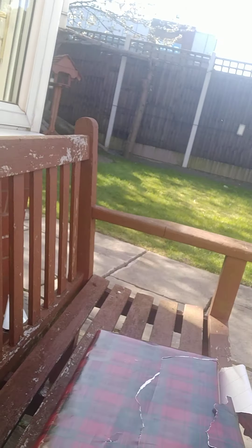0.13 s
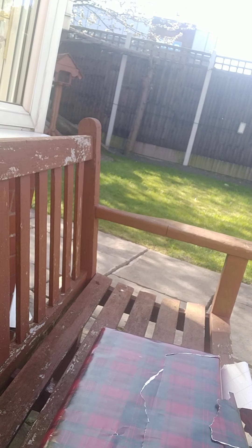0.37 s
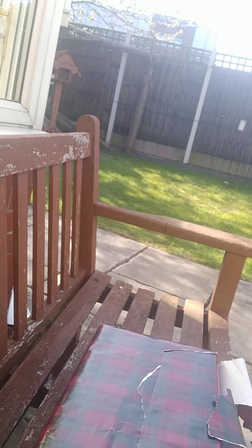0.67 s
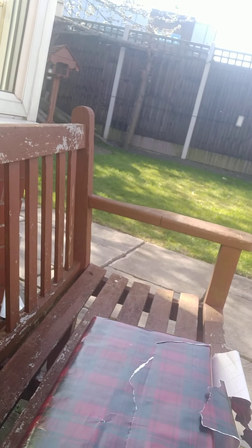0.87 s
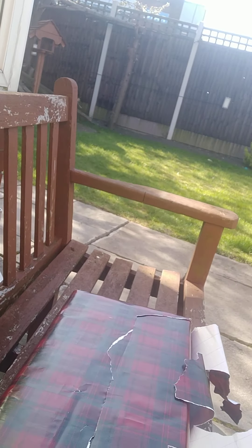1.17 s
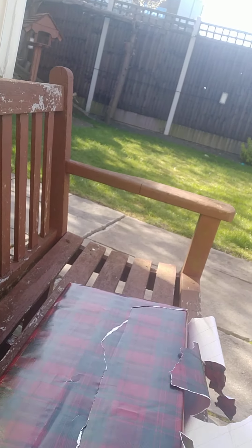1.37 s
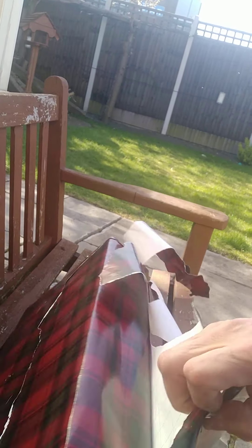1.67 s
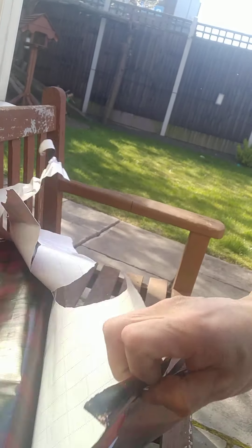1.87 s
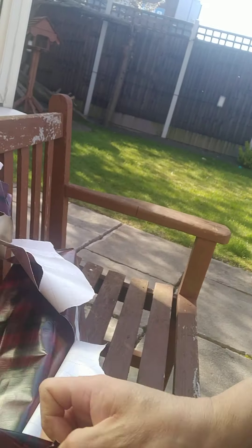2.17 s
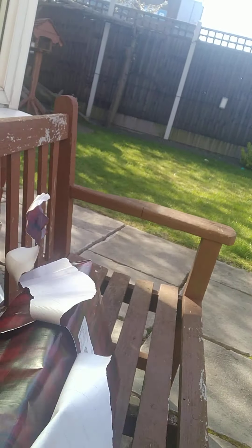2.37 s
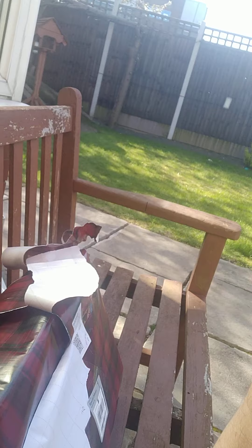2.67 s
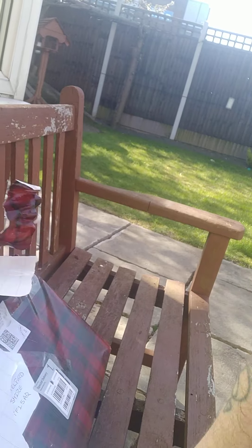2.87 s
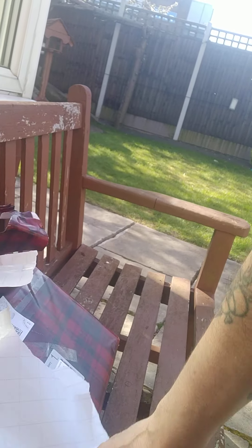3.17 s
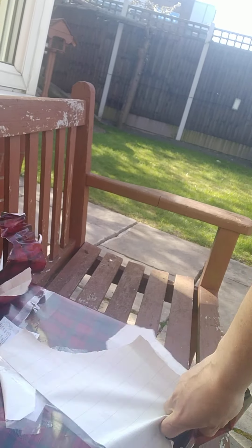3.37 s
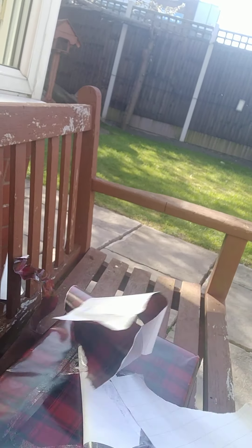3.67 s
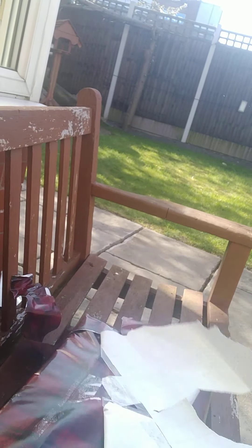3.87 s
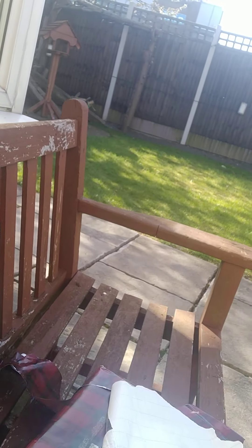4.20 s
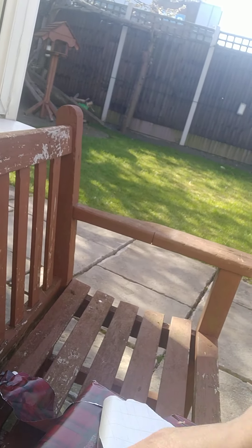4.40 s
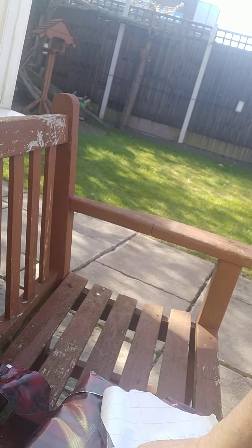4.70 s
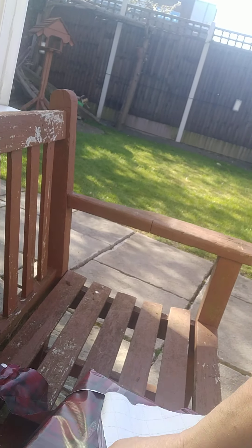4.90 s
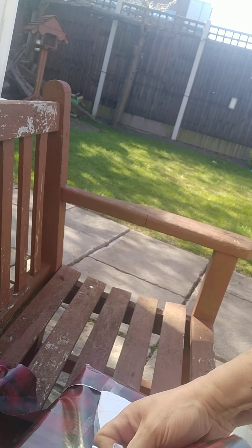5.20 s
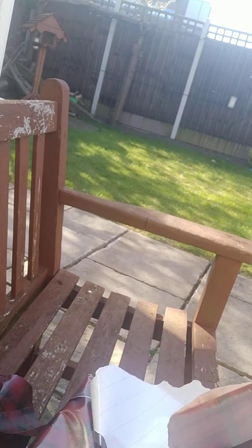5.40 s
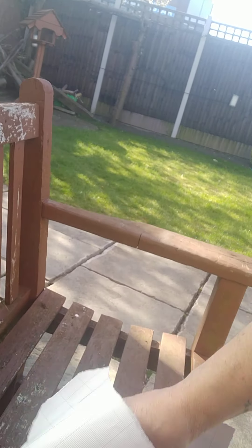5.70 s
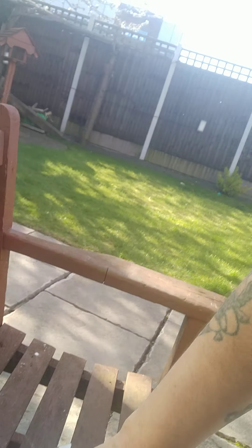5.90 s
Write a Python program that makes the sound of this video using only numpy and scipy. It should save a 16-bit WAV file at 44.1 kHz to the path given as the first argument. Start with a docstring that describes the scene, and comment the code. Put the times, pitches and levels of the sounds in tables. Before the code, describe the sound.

Close, bright tearing and crinkling of stiff gift wrap by hand outdoors, with dull box knocks and low rumble on the microphone.

```python
"""Wrapping paper is torn off a parcel on a garden bench, an arm's length from a hand-held phone.
Fibres break in dense noisy streams as it rips and crinkles; creases crack and ring one by one.
The box thumps as a damped swing and squeaks by stick and slip where paper slides over it.
Moving air and the handling of the parcel rumble on the microphone as low noise, over a quiet
garden of coloured noise."""
import sys
import numpy as np
from scipy import signal
from scipy.fft import rfft, irfft
from scipy.io import wavfile
from scipy.ndimage import uniform_filter1d

SR = 44100
rng = np.random.default_rng(int(sys.argv[2]) if len(sys.argv) > 2 else 0)


def inscribe(sig):
    """Save sig as 16-bit PCM at rate SR to the path in sys.argv[1].

    A 1-D sig is mono; a 2-D sig holds one channel per row.
    Samples are clipped to [-1, 1] before scaling.
    """
    pcm = np.round(np.clip(np.atleast_2d(sig).T, -1, 1) * 32767)
    wavfile.write(sys.argv[1], SR, pcm.astype(np.int16))


N = 266805
T = np.arange(N) / SR  # s

# spectrum of breaking paper, columns: f/Hz, level/dB (per Hz)
PAPER_SPECTRUM = [(71, -39), (120, -6), (272, -3), (410, -1), (524, -12.5), (874, -3.5), (1400, -9),
                  (2480, -1), (4590, -2.5), (7050, -2.5), (9590, -9), (12000, -22.5), (15000, -20.5),
                  (16000, -15)]


def undb(db):
    """Turn dB into an amplitude factor."""
    return 10 ** (np.asarray(db) / 20)


def unit(x):
    """Scale to an RMS of 1."""
    return x / np.sqrt(np.mean(x ** 2))


def colour(x, points):
    """Causal filter through (Hz, dB) points, from the folded cepstrum."""
    hz, db = np.transpose(points)
    grid_hz = np.maximum(np.fft.rfftfreq(4096, 1 / SR), 1)
    gain = undb(np.interp(np.log(grid_hz), np.log(hz), db))
    cepstrum = irfft(np.log(gain))
    half = len(cepstrum) // 2
    cepstrum[1:half] *= 2
    cepstrum[half + 1:] = 0
    impulse = irfft(np.exp(rfft(cepstrum)))
    return signal.fftconvolve(x, impulse)[:len(x)]


def butter(x, hz, kind, order=2):
    """Butterworth filter."""
    return signal.sosfilt(signal.butter(order, hz, kind, fs=SR, output="sos"), x)


def ring(x, hz, width_hz):
    """Resonance with gain 1 at its centre."""
    b, a = signal.iirpeak(hz, hz / width_hz, SR)
    return signal.lfilter(b, a, x)


def walk(rate):
    """Random levels 1 / rate s apart, joined by straight lines; spread near 1."""
    knots = np.arange(0, N / SR + 1 / rate, 1 / rate)
    return 1.2 * np.interp(T, knots, rng.standard_normal(len(knots)))


def fade(t60, size):
    """Exponential decay by 60 dB in t60 seconds, 3 ms at the least."""
    return np.exp(-np.log(1000) * np.arange(size) / SR / max(t60, .003))


def fibres(treble_db, body_db, flap_hz, flap_db, per_s, spread_db, most_db,
           reach_oct, cycles, smear_s, patchy_db, patch_rate):
    """Breaks of very unequal size; each rings the patch of sheet round it, so each has its own pitch."""
    bands_hz = 170 * 2 ** np.arange(0, 6.6, .5)  # half an octave apart
    paper_hz, paper_db = np.transpose(PAPER_SPECTRUM)

    chance = rng.random((3, int(per_s * N / SR)))
    at = (chance[0] * N).astype(int)
    size_db = np.minimum(-spread_db * np.log(1 - chance[1]), most_db)
    power = undb(2 * size_db)  # amplitude squared
    pitch_hz = bands_hz[0] * (bands_hz[-1] / bands_hz[0]) ** chance[2]

    out, body_power = 0, 0
    for hz in bands_hz:
        nearness = np.exp(-(np.log2(hz / pitch_hz) / reach_oct) ** 2)
        hits = np.bincount(at, power * nearness, N)
        # low patches ring longer
        decay = fade(smear_s + cycles / hz, size=2)[1]
        envelope = np.sqrt(signal.lfilter([1], [1, -decay ** 2], hits))
        band = butter(envelope * rng.standard_normal(N), [hz / 2 ** .25, hz * 2 ** .25], "band")
        # a band's width grows with its pitch
        strength = undb(np.interp(np.log(hz), np.log(paper_hz), paper_db)) * np.sqrt(hz)
        body_power += strength ** 2 * (1400 < hz < 6000)
        # treble lift grows from 4 to 8 kHz, body lift from 2 down to 1 kHz
        lift_db = np.clip(np.log2(hz / 4000), 0, 1) * treble_db
        lift_db = lift_db + np.clip(np.log2(2000 / hz), 0, 1) * body_db
        lift_db = lift_db + flap_db * np.exp(-(np.log2(hz / flap_hz) / 0.17) ** 2)
        lift_db = lift_db + 1.48 * walk(12)  # each band drifts on its own
        out = out + strength * unit(band) * undb(lift_db)
    patches = unit(undb(patchy_db * walk(patch_rate)))
    return out * patches / np.sqrt(body_power)


def rips():
    """A dense stream of breaking fibres swells, holds and dies; the strongest rip of the moment sounds."""
    # the long first tear, which grows and breaks off
    # columns: t/s, level/dB, treble lift/dB, ring of the taut flap f/Hz
    first_tear = [(0.0, -24, 2, 3160), (0.04, -26, 7.5, 3550), (0.104, -24, 0, 2650),
                  (0.17, -27.5, 2, 3460), (0.352, -24, 6.5, 3130), (0.406, -25.5, 5, 4150),
                  (0.464, -17, 3.5, 2980), (0.511, -12.5, 5, 3640), (0.521, -39, 4, 3960)]
    # short rips, columns: full strength from t/s, peak level/dB, swell t/s, hold t/s, dying t/s,
    # treble lift/dB, ring of the taut flap f/Hz
    short_rips = [(0.645, -40.5, 0.046, .004, .01, -33, 2970), (0.723, -35, .02, 0.012, .012, -33, 3030),
                  (0.897, -39, 0.0075, 0.021, 0.062, -8, 3170), (1.648, -16, 0.0072, 0.021, .08, 0, 3260),
                  (1.708, -26, 0.0033, .01, 0.13, 1, 2870), (1.788, -21.5, 0.056, 0.038, .04, -2, 3180),
                  (1.963, -12.5, .012, 0.015, .025, 0.5, 3240),
                  (2.271, -21, 0.059, 0.019, 0.013, -2.5, 3050),
                  (2.367, -23.5, 0.022, 0.023, 0.086, -16, 2930),
                  (2.518, -14, .015, 0.015, 0.034, -5, 3220), (3.097, -25.5, 0.062, 0.037, 0.15, 1.5, 3350),
                  (3.405, -17, 0.059, 0.038, 0.022, -1.5, 3400), (3.624, -14, 0.062, 0.033, 0.042, 2, 3560),
                  (3.901, -12.5, .012, 0.016, .045, 1, 3440), (4.597, -19, 0.012, 0.011, 0.013, -3.5, 2890),
                  (4.712, -14, 0.0034, 0.011, 0.016, -4.5, 2500),
                  (5.115, -14.5, 0.0027, .006, 0.055, -0.5, 3200),
                  (5.373, -17.5, .13, .027, 0.068, 1, 3070), (5.863, -15.5, 0.0031, 0.007, .025, 3, 3030)]
    swell_db, dying_db = 16.5, 26.5  # a rip sets in and stops this far under its peak
    swell_bend, dying_bend = 0.74, 0.95  # 1 = straight in dB
    dull_db_per_db = 0.63  # the treble thins as a rip weakens

    s, *columns = np.transpose(first_tear)
    db, treble_db, flap_hz = (np.interp(T, s, c) for c in columns)
    gain = (T < s[-1]) * undb(db)
    for at, peak_db, swell, hold, dying, lift_db, hz in short_rips:
        a, b = int((at - swell) * SR), int((at + hold + dying) * SR)
        t = T[a:b] - at
        rising_db = swell_db * np.abs(t / swell) ** swell_bend
        falling_db = dying_db * np.maximum((t - hold) / dying, 0) ** dying_bend
        under_db = np.where(t < 0, rising_db, falling_db)
        leads = a + np.flatnonzero(undb(peak_db - under_db) > gain[a:b])
        under_db = under_db[leads - a]
        gain[leads] = undb(peak_db - under_db)
        flap_hz[leads] = hz
        treble_db[leads] = lift_db - dull_db_per_db * under_db
    stream = fibres(treble_db, -1.5, flap_hz, flap_db=8, per_s=5300, spread_db=1.5, most_db=12,
                    reach_oct=2.2, cycles=4.2, smear_s=0.0058, patchy_db=1.1, patch_rate=300)
    return uniform_filter1d(gain, size=64) * stream


def microphone_rumble():
    """Low rumble on the microphone, from moving air and from handling the parcel; uneven in level."""
    # columns: t/s, level/dB
    rumble_levels = [(0.0, -35.5), (1.5, -36), (1.58, -28.5), (2.78, -32), (2.86, -23), (2.91, -35),
                     (3.49, -25.5), (3.64, -41), (3.69, -25), (3.77, -34.5), (6.0, -35), (6.05, -45)]
    rumble = butter(rng.standard_normal(N), 20, "low", order=1)
    rumble = butter(rumble, 96.0, "low", order=3)
    rumble = butter(rumble, 11.7, "high")
    unevenness = undb(1.5 * walk(12))
    return unit(rumble * unevenness) * undb(np.interp(T, *np.transpose(rumble_levels)))


def garden():
    """The quiet garden behind the bench: coloured noise whose level drifts slightly."""
    # columns: f/Hz, level/dB (per Hz)
    garden_spectrum = [(59, -30), (100, 0), (595, -15), (768, -15), (1950, -28), (2320, -23), (14400, -52),
                       (16000, -57)]
    hush = unit(colour(rng.standard_normal(N), garden_spectrum))
    return hush * undb(-51 + 0.5 * walk(2.7))


def thumps(size=8192):
    """A soft push sets the hollow box swinging briefly, with a dull flap of paper."""
    # the box knocked or the sheet flapping, columns: t/s, peak level/dB, pitch f/Hz, t60/s
    knocks = [(0.077, -19.5, 251, 0.14), (0.485, -31, 257, 0.04), (1.653, -19, 284, 0.032),
              (1.655, -18, 76, 0.12), (1.831, -13.5, 269, 0.054), (2.234, -22.5, 344, 0.16),
              (2.501, -18.5, 134, 0.03), (2.612, -9.5, 265, 0.032), (2.645, -12, 167, 0.057),
              (2.974, -21, 432, 0.06), (3.252, -27, 154, 0.035), (3.397, -18, 199, 0.057),
              (3.441, -12, 320, 0.027), (3.49, -22.5, 260, 0.056), (3.699, -13, 188.5, 0.17),
              (3.895, -21, 278, 0.11), (4.605, -17.5, 190, 0.05), (4.61, -19.5, 95, 0.07),
              (5.071, -22, 218, 0.046)]
    out, t = np.zeros(N + size), np.arange(size) / SR
    for s, db, hz, t60 in knocks:
        flap = undb(-6) * unit(ring(rng.standard_normal(size), 0.89 * hz, 0.82 * hz))
        push = 1 - np.exp(-t / 0.0019)  # soft onset
        swing = (np.sin(2 * np.pi * hz * t) + flap) * push * fade(t60, size=size)
        i = int(s * SR)
        out[i:i + size] += undb(db) * swing / np.abs(swing).max()
    return out[:N]


def snaps(size=4096):
    """A crease strains for a moment, gives with one crack, then crackles out; the patch beside it rings."""
    # columns: t/s, peak level/dB, ring f/Hz, t60/s
    creases = [(0.1063, 3, 2520, 0.035), (0.124, -6.5, 5620, 0.042), (0.4254, -6, 3460, 0.032),
               (0.474, 4, 8800, 0.027), (0.488, -2, 5230, 0.019), (0.7559, -20, 2800, 0.019),
               (0.8556, -20.5, 3460, 0.05), (1.073, -22.5, 4000, 0.038), (1.0912, -12, 2600, 0.071),
               (1.214, -9, 3570, 0.088), (1.2316, -13, 6360, 0.035), (1.245, -13, 6300, 0.032),
               (1.365, -10.5, 2750, 0.03), (1.446, -8, 3300, 0.038), (1.6042, -21, 3230, 0.055),
               (1.6258, -16.5, 3170, 0.14), (1.6466, 2, 2980, 0.023), (1.704, 2.5, 1730, 0.17),
               (1.8373, -2, 4100, 0.03), (1.936, -15, 5320, 0.043), (1.9952, -5, 4160, 0.035),
               (2.0223, -7.5, 6170, 0.051), (2.057, -3, 5400, 0.04), (2.082, -15, 4360, 0.027),
               (2.165, -18.5, 940, 0.035), (2.196, -9.5, 2440, 0.032), (2.2841, 5, 2240, 0.023),
               (2.3205, -8, 1220, 0.063), (2.368, -1.5, 2290, 0.033), (2.4577, -0.5, 3330, 0.028),
               (2.4946, -4, 1950, 0.064), (2.5172, 9, 7200, 0.029), (2.5283, 1.5, 3880, 0.026),
               (2.594, -9, 3200, 0.023), (2.632, -8, 2980, 0.089), (2.647, -3.5, 2700, 0.055),
               (2.6813, -4.5, 6100, 0.055), (2.7648, -13.5, 2570, 0.068), (2.828, -16, 4940, 0.028),
               (2.8448, -8, 3670, 0.055), (2.8676, -0.5, 6200, 0.027), (2.901, -10, 5890, 0.018),
               (2.935, -1, 4900, 0.028), (2.9763, -4, 2370, 0.045), (3.027, -13.5, 3370, 0.032),
               (3.2529, -11, 4450, 0.14), (3.3099, -1.5, 4300, 0.066), (3.3595, -4.5, 5260, 0.085),
               (3.4066, 4.5, 3590, 0.067), (3.5665, -0.5, 4360, 0.033), (3.5962, 2.5, 3440, 0.028),
               (3.7023, -4.5, 3970, 0.18), (3.7652, -7.5, 3700, 0.052), (4.027, -13, 3380, 0.1),
               (4.093, -7, 2640, 0.048), (4.174, -13, 3360, 0.015), (4.3157, -11.5, 4270, 0.079),
               (4.333, -12.5, 2940, 0.053), (4.36, -12.5, 7100, 0.086), (4.3797, -3.5, 3570, 0.049),
               (4.4104, -15.5, 7480, 0.032), (4.6959, -5.5, 2600, 0.032), (4.745, -9.5, 2770, 0.086),
               (4.792, -12, 2940, 0.043), (4.8562, -9.5, 3680, 0.03), (4.882, -8.5, 5100, 0.017),
               (4.9146, -8.5, 2770, 0.031), (4.941, -8, 5130, 0.036), (4.9513, -4.5, 2850, 0.17),
               (5.0045, -7, 3400, 0.11), (5.0617, -1.5, 1020, 0.14), (5.1116, -3, 3460, 0.032),
               (5.1783, -6, 4210, 0.038), (5.262, -6, 3860, 0.036), (5.365, 4, 2120, 0.018),
               (5.3889, 5, 4500, 0.047), (5.5077, -11.5, 2580, 0.097), (5.582, -15.5, 8600, 0.085),
               (5.6816, -9.5, 1880, 0.14), (5.7054, -6.5, 2900, 0.093), (5.7667, -7, 2870, 0.024),
               (5.786, -3.5, 7300, 0.053), (5.835, -10, 2650, 0.064), (5.8609, 1, 3500, 0.037),
               (5.9206, -12.5, 2800, 0.028)]
    out, lead = np.zeros(N + size), int(.001 * SR)  # 1 ms of strain before the crack
    for s, db, hz, t60 in creases:
        grain_db = 2.5 * np.repeat(rng.standard_normal(size // 32), 32)
        crackle = rng.standard_normal(size) * undb(grain_db)
        crackle = crackle * fade(t60, size=size) * np.minimum(np.arange(size) / lead, 1)
        crack = undb(15) * rng.standard_normal(size) * fade(.003, size=size)
        burst = colour(crackle + np.roll(crack, lead), PAPER_SPECTRUM)
        burst = burst + undb(4.5) * ring(burst, hz, 0.25 * hz)
        i = int(s * SR)
        out[i:i + size] += undb(db) * burst / np.abs(burst).max()
    return out[:N]


def squeak():
    """Stick and slip of paper sliding over the box: a rough tone, wavering in pitch and level."""
    # columns: t/s, pitch f/Hz, level/dB
    slide = [(0.135, 609, -40), (0.177, 492, -36), (0.233, 997, -34), (0.29, 905, -48)]
    s, hz, db = np.transpose(slide)
    pitch_hz = np.interp(T, s, hz) * (1 + 0.024 * walk(194))
    phase = 2 * np.pi * np.cumsum(pitch_hz) / SR
    edge = uniform_filter1d(1. * ((T > s[0]) & (T < s[-1])), size=512)
    level = undb(np.interp(T, s, db) + 3.7 * walk(101))
    return np.sqrt(2) * edge * level * np.sin(phase)


def rustle():
    """Crinkling under the hand: sparser fibre breaks, with a resonance that wanders in pitch."""
    # handling of the sheet, now brisk, now almost still, columns: t/s, level/dB, treble lift/dB
    handling = [(0.52, -39, -1), (0.69, -67, -10), (0.86, -70, 7), (1.1, -50, -5), (1.27, -41, -4.5),
                (1.7, -43, -2), (1.848, -27, -15), (1.9, -41, -10), (2.3, -36.5, -10), (2.398, -26.5, -1),
                (2.47, -40.5, -5), (2.68, -29.5, -10), (2.72, -39.5, -11), (2.81, -45, -8),
                (2.86, -37.5, -3.5), (3.24, -33.5, 2), (3.5, -31.5, -4), (3.55, -39, -7), (3.7, -32, 2),
                (3.88, -37.5, -12), (4.0, -29, -4), (4.3, -43, -1), (4.46, -47.5, -0.5), (4.6, -32.5, -5),
                (4.74, -38, -0.5), (5.199, -30.5, 3), (5.6, -40.5, -5.5), (5.75, -32, -2.5),
                (6.05, -39.5, -1.5)]
    s, *columns = np.transpose(handling)
    db, treble_db = (np.interp(T, s, c) for c in columns)
    wander_hz = 3200 * 2 ** (0.34 * walk(13.0))
    crinkle = fibres(treble_db, 3.06, wander_hz, flap_db=1.0, per_s=1300, spread_db=2.0, most_db=22.0,
                     reach_oct=1.13, cycles=40, smear_s=0.02, patchy_db=3.0, patch_rate=35)
    return (T > s[0]) * undb(db) * crinkle


def reflections(parcel):
    """Bench, paving and house wall send back a short, dull blur."""
    blur = rng.standard_normal(8192) * fade(0.13, size=8192)
    blur = blur * (np.arange(8192) > .003 * SR)  # nothing returns in the first 3 ms
    blur = butter(blur / np.sqrt(np.sum(blur ** 2)), 4800, "low")
    return undb(-17) * signal.fftconvolve(parcel, blur)[:N]


def scene():
    """The parcel on the bench with its reflections, the rumble on the microphone and the garden."""
    parcel = rips() + thumps() + snaps() + squeak() + rustle()
    return (parcel + reflections(parcel) + microphone_rumble() + garden())[None]


def record(dry):
    """The phone rounds the loudest peaks and cuts the top."""
    rounded = np.tanh(1.068 * dry) / 1.072
    top_cut = signal.ellip(10, .2, 60, 15800, fs=SR, output="sos")  # low-pass, edge in Hz
    return signal.sosfilt(top_cut, rounded)


dry = scene()
out = record(dry)
inscribe(out)
```